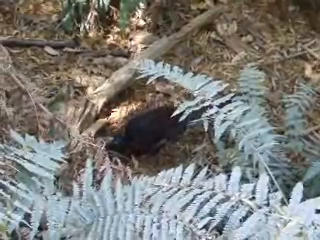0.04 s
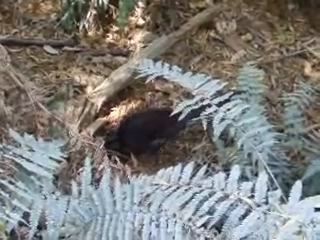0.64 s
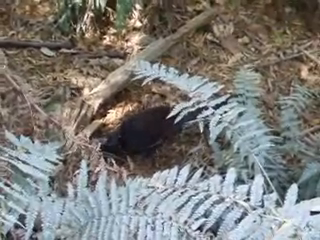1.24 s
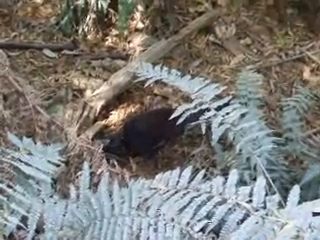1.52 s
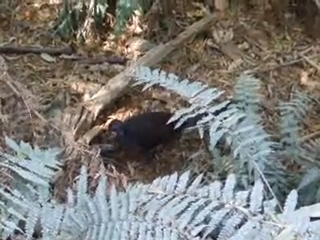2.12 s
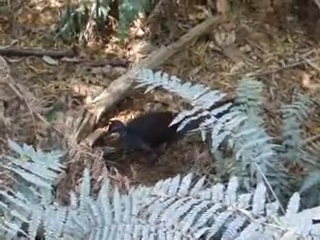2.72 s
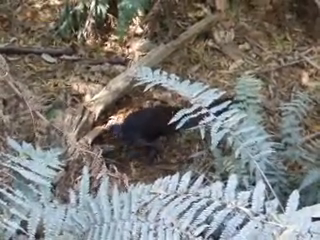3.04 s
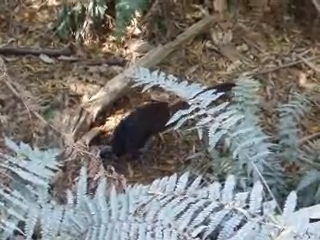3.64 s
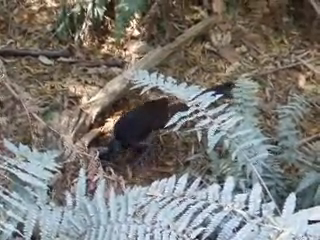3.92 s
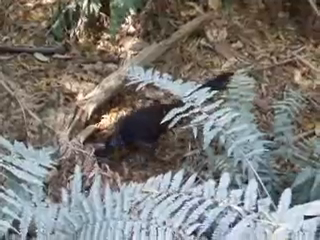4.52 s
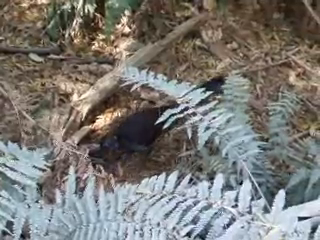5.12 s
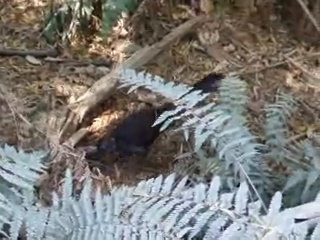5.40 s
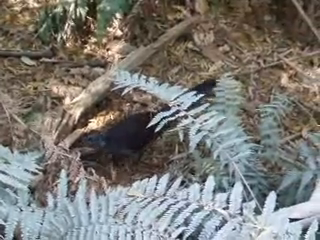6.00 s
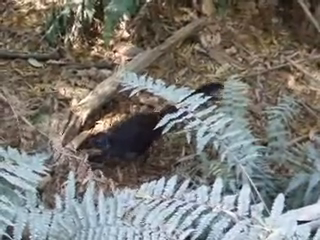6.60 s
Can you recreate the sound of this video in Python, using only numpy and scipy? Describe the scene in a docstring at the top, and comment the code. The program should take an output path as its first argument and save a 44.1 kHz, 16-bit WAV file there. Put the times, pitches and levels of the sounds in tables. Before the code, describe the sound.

An even, soft hiss of forest and microphone runs for nearly seven seconds, together with a thin, high, buzzy electronic whine. A bird gives a couple of faint pecks in dry leaves at about 0.6 seconds. At 1.0 and 1.5 seconds a camera button clicks right at the microphone, sharp and dry, the loudest sounds. From about 2.4 to 6.2 seconds the bird rakes the leaf litter in short, irregular, quiet scratches mixed with pecks and tiny stalk snaps, the clearest at 2.9 and 6.2 seconds. Small birds peep briefly and very high in the trees around 1.2, 2.2, 3.3 to 3.5 and 5.5 seconds, some notes slightly raspy. The scratches and peeps carry a slight woodland echo. Underneath, a far engine drones low and barely audible, swelling a little toward 4.7 seconds and dropping away by 5.5.

```python
"""A dark bird rakes and pecks through dry leaf litter under ferns, on the forest floor.
Small birds peep in the trees, and an engine drones far off. Right at the microphone, a button on
the hand-held camera clicks twice. The camera's electronics hiss and whine, and its slow,
held sampling mirrors every sound into the treble."""
import sys
import numpy as np
from scipy import signal
from scipy.fft import rfft, irfft
from scipy.io import wavfile
from scipy.ndimage import uniform_filter1d

SR = 44100
rng = np.random.default_rng(int(sys.argv[2]) if len(sys.argv) > 2 else 0)


def master(y):
    """Save y as 16-bit WAV."""
    cut = np.clip(np.atleast_2d(y).T, -1, 1)
    pcm = np.round(cut * 32767)  # scale
    wavfile.write(sys.argv[1], SR, pcm.astype(np.int16))


N = 297675
TIME = np.arange(N) / SR
FREQ = np.arange(N // 2 + 1) * SR / N
HOLD_HZ = 16000  # the camera's sampling rate

# hiss of forest and microphone: (frequency [Hz], relative level [dB])
HISS_SPECTRUM = [(20, -1), (60, 0), (130, 1), (350, 0), (600, -2), (1200, -4), (2500, -5.5), (3400, -7),
                 (4800, -7.5), (6500, -7.5), (8000, -5)]
# the far engine's drone at the microphone: (time [s], level [dB])
DRONE_LEVELS = [(0, -65), (2.2, -65.5), (3.7, -61.5), (4.7, -60), (5.15, -62.5), (5.45, -73.5), (6.75, -72)]
# its other tones, swelling and fading: (time [s], length [s], pitch [Hz], level [dB])
ENGINE_SWELLS = [(1.5, 2.2, 174.5, -65.5), (2.4, .75, 90, -63.5), (3.6, .5, 175.6, -61.5)]
# claw strokes under the ferns: (time [s], length [s], relative leaf level [dB], relative soil level [dB])
CLAW_STROKES = [(0.616, 0.014, -54.5, -70), (2.587, 0.07, -57, -59), (2.72, .115, -53.5, -60),
                (2.847, .02, -44, -57), (3.695, .014, -55, -58), (3.832, 0.013, -59, -64),
                (4.113, .135, -54.5, -57.5), (4.932, .016, -53, -58), (5.011, .145, -55, -59),
                (5.493, .055, -53, -58), (5.585, 0.083, -65, -61), (5.947, .08, -58, -62),
                (6.1, 0.054, -62, -65)]
# dry leaves breaking: (frequency [Hz], relative level [dB])
LEAF_SPECTRUM = [(1500, -25), (2700, -8), (3500, -4.5), (5400, -2), (6800, -0.5), (8000, -2.5)]
# soil being scuffed: (frequency [Hz], relative level [dB])
SOIL_SPECTRUM = [(300, -25), (800, -2), (2200, 1.5), (3200, -16), (6000, -35)]
# pecks and snapping stalks: (time [s], relative peak [dB], pitch [Hz])
PECKS_AND_SNAPS = [(0.605, -46, 4150), (0.7244, -46, 7620), (2.4453, -38, 7800), (2.5875, -43, 7330),
                   (2.8429, -39, 6210), (2.8998, -32.5, 4850), (3.6935, -44, 4230), (3.8357, -43, 6500),
                   (4.8864, -41, 7730), (4.9494, -45, 7760), (5.0154, -44, 6410), (5.6511, -45, 5180),
                   (5.9584, -46, 5760), (6.1814, -32.5, 7740)]
# the camera's button, pressed and let go: (time [s], relative level [dB], contact brightness [Hz])
BUTTON_KNOCKS = [(1.0069, -21, 16000), (1.0073, -9.7, 12000), (1.4692, 0.8, 1070), (1.4703, -22.5, 10000),
                 (1.4808, -17, 700)]
# modes of the camera case: (frequency [Hz], relative level [dB], time to fall 60 dB [s])
CASE_MODES = [(350, -34, 0.049), (540, -25.5, 0.07), (728, -13, 0.029), (1080, -15.5, 0.011),
              (1602, -22.5, 0.038), (2230, -28.5, 0.049), (2720, -9, 0.016), (3480, -9, 0.015),
              (4380, 1.5, 0.0051), (5920, -8.5, 0.019), (6670, 0, 0.0052)]
# peeps in the trees: (time [s], length [s], start pitch [Hz], settled pitch [Hz], level [dB], rasp [0-1])
BIRD_NOTES = [(1.159, 0.061, 6460, 6680, -47, 0.16), (2.192, 0.07, 5000, 5520, -51, 0.9),
              (3.295, 0.044, 7940, 7170, -46.5, 0.35), (3.325, 0.066, 7130, 7170, -44, 0.08),
              (3.49, 0.038, 6920, 7230, -47, .2), (3.52, 0.033, 7240, 7550, -48, 0.3),
              (5.499, 0.041, 4300, 5570, -45, 0.9), (5.513, 0.033, 4260, 4050, -49.5, 0.87)]


def undb(db):
    """Decibels to gain."""
    return 10 ** (np.asarray(db) / 20)


def unit(x):
    """Scale to rms 1."""
    return x / np.sqrt(np.mean(x ** 2))


def colour(x, spectrum):
    """Shape a sound by a spectrum, up to half the camera's sampling rate; rms 1."""
    hz, db = np.transpose(spectrum)
    gain = undb(np.interp(np.log(FREQ + 1), np.log(hz), db)) * (FREQ < HOLD_HZ / 2)
    return unit(irfft(rfft(x) * gain, N))


def wander(per_s):
    """Smooth random wander of rms 1."""
    span = int(SR / per_s)
    steps = np.repeat(rng.standard_normal(N // span + 1), span)
    return unit(uniform_filter1d(uniform_filter1d(steps, span), span)[:N])


def add(out, s, sound):
    """Mix a short sound in at time s."""
    i = int(s * SR)
    out[i:i + len(sound)] += sound[:N - i]


def arch(s, length_s):
    """Gain that swells and fades once, like half a sine."""
    return np.sin(np.pi * np.clip((TIME - s) / length_s, 0, 1))


def unsteady_sine(hz, wobble, wobble_per_s):
    """A sine of rms 1 whose pitch wanders by the fraction wobble."""
    pitch = hz * (1 + wobble * wander(wobble_per_s))
    return np.sqrt(2) * np.sin(2 * np.pi * np.cumsum(pitch) / SR)


def hiss(level_db=-51.5, waver_db=0.08):
    """An even bed of noise from the forest and the microphone itself."""
    return colour(rng.standard_normal(N), HISS_SPECTRUM) * undb(level_db + waver_db * wander(3.45))


def camera_whine(level_db=-47.5, chop_hz=132.9, flip_hz=14.77, squareness=1.8):
    """Interference in the camera: a tone at half its sampling rate, chopped fast and flipped slowly."""
    chop = np.tanh(squareness * np.sin(2 * np.pi * chop_hz * TIME))
    flip = np.sign(np.sin(2 * np.pi * flip_hz * TIME))
    return undb(level_db) * unit(chop * flip * np.cos(np.pi * HOLD_HZ * TIME))


def far_engine(drone_hz=109.3, waver_db=1):
    """Only the engine's low tones carry as far as the microphone, wavering in the air."""
    times, levels = np.transpose(DRONE_LEVELS)
    tones = [(drone_hz, undb(np.interp(TIME, times, levels)))]
    tones += [(hz, undb(db) * arch(s, length_s)) for s, length_s, hz, db in ENGINE_SWELLS]
    out = np.zeros(N)
    for hz, gain in tones:
        tone = unsteady_sine(hz, wobble=0.0073, wobble_per_s=12)
        out += gain * tone * undb(waver_db * wander(14))
    return out


def crackle(per_s, spread_db):
    """Tiny fractures at random moments; a positive spread makes a few louder, a negative one softer."""
    size = undb(spread_db * np.minimum(rng.exponential(size=N), 4))
    return (rng.random(N) < per_s / SR) * size * rng.choice([-1, 1], N)


def claw_stroke(s, length_s, attack_s=0.027, release_s=0.013, debris_db=-8.5, debris_s=0.1):
    """Envelope of one stroke: the claws bite, drag and lift, then the flung leaves fall back."""
    bite = np.clip((TIME - s) / attack_s + 1, 0, 1)
    since_lift = np.maximum(TIME - s - length_s, 0)
    debris = undb(debris_db) * np.exp(-since_lift / debris_s)
    return bite * np.maximum(np.exp(-since_lift / release_s), debris)


def raking(leaf_trim_db=2, soil_trim_db=-3, settling_db=-61):
    """On the forest floor, claws break dry leaves in dense crackles and scuff the soil beneath."""
    leaf_gain, soil_gain = 0, 0
    for s, length_s, leaf_db, soil_db in CLAW_STROKES:
        force = claw_stroke(s, length_s)
        leaf_gain = np.hypot(leaf_gain, force * undb(leaf_db + leaf_trim_db))
        soil_gain = np.hypot(soil_gain, force * undb(soil_db + soil_trim_db))
    leaves = colour(crackle(per_s=2200, spread_db=0.5), LEAF_SPECTRUM)
    scuffs = colour(crackle(per_s=4000, spread_db=-1.5), SOIL_SPECTRUM)
    # the litter also settles faintly between the strokes
    settling = undb(settling_db) * colour(crackle(per_s=64, spread_db=-6), LEAF_SPECTRUM)
    return leaves * leaf_gain + scuffs * soil_gain + settling


def pecks_and_snaps(width_hz=2200, decay_s=0.0028, trim_db=4):
    """Down in the litter, each peck or breaking stalk is a short burst round its own pitch."""
    out, t = np.zeros(N), TIME[:SR // 25]
    freq = np.fft.rfftfreq(len(t), 1 / SR)
    for s, db, hz in PECKS_AND_SNAPS:
        burst = rng.standard_normal(len(t)) * np.exp(-t / decay_s)
        resonance = 1 / (1 + 1j * (freq - hz) / width_hz) ** 2
        snap = irfft(rfft(burst) * resonance, len(t))
        add(out, s, snap / np.abs(snap).max() * undb(db + trim_db))
    return out


def camera_button(crack_db=-10, crack_s=0.002, low_cut_hz=375):
    """Knocks ring the case at the microphone; a soft contact pushes longer and favours the low modes."""
    out, t = np.zeros(N), TIME[:SR // 10]
    ring = sum(undb(db) * np.sin(2 * np.pi * hz * t) * np.exp(-np.log(1000) * t / t60_s)
               for hz, db, t60_s in CASE_MODES)
    # countless small, quickly damped modes make a dry crack
    crack = undb(crack_db) * rng.standard_normal(len(t)) * np.exp(-t / crack_s)
    for s, db, bright_hz in BUTTON_KNOCKS:
        push = t * np.exp(-2 * np.pi * bright_hz * t)
        add(out, s, undb(db) * signal.fftconvolve(ring + crack, push / push.sum()))
    # so small a case radiates no bass
    return signal.sosfilt(signal.butter(6, low_cut_hz, "high", fs=SR, output="sos"), out)


def small_birds(slide_s=0.0091, flutter_db=2):
    """Thin whistles and raspy chips from the trees; each slides on to its pitch as it swells and fades."""
    out = np.zeros(N)
    for s, length_s, start_hz, settled_hz, db, rasp in BIRD_NOTES:
        hz = settled_hz + (start_hz - settled_hz) * np.exp(-np.maximum(TIME - s, 0) / slide_s)
        whistle = unsteady_sine(hz, wobble=0.042 * rasp, wobble_per_s=2500)
        out += undb(db) * arch(s, length_s) * whistle
    return out * undb(flutter_db * wander(140))


def forest_echoes(direct, t60_s=0.4, wet_db=-7.5, delay_s=0.012):
    """The direct sound reaches the microphone first, then scattered echoes from trunks and ferns."""
    t = TIME[:SR]
    tail = rng.standard_normal(SR) * np.exp(-np.log(1000) * t / t60_s) * (t > delay_s)
    return direct + undb(wet_db) * signal.fftconvolve(direct, tail / np.linalg.norm(tail))[:N]


def scene():
    """Forest floor, trees, distant engine and the camera's own noises, on one microphone channel."""
    forest = forest_echoes(raking() + pecks_and_snaps() + small_birds())
    return (forest + far_engine() + camera_button() + hiss() + camera_whine())[None]


def record(dry):
    """The camera samples slowly and holds each value; the steps mirror the sound into the treble."""
    samples = signal.resample(dry, N * HOLD_HZ // SR, axis=1)
    held = samples[:, np.arange(N) * HOLD_HZ // SR]
    top_cut = signal.ellip(12, 0.1, 80, 12750, fs=SR, output="sos")  # low-pass at 12750 Hz
    return signal.sosfilt(top_cut, held) - 0.0035  # the converter rests slightly below zero


dry = scene()
out = record(dry)
master(out)
```